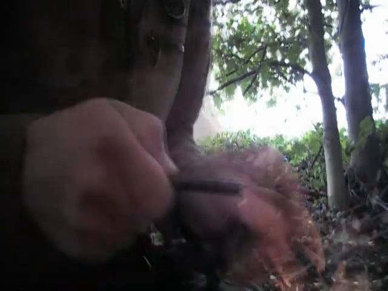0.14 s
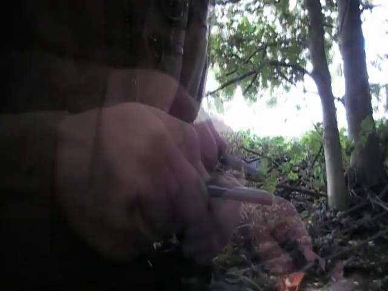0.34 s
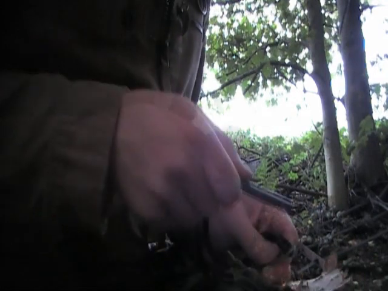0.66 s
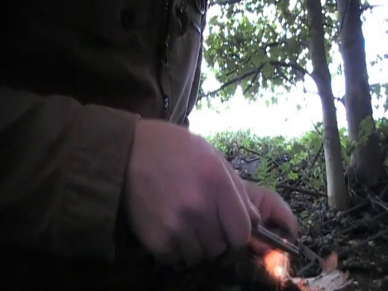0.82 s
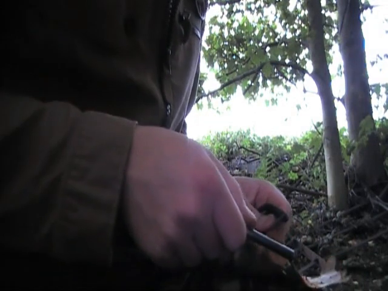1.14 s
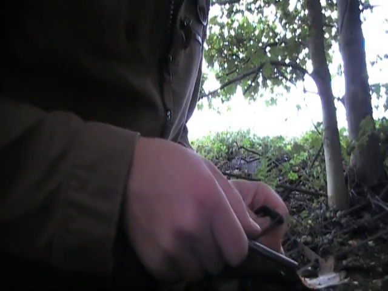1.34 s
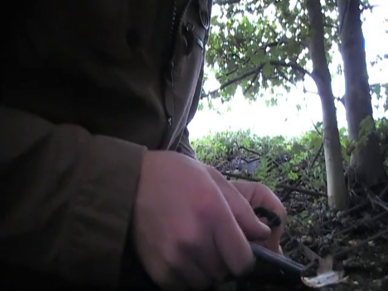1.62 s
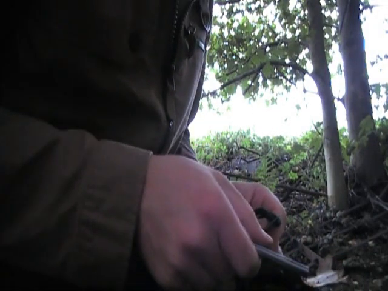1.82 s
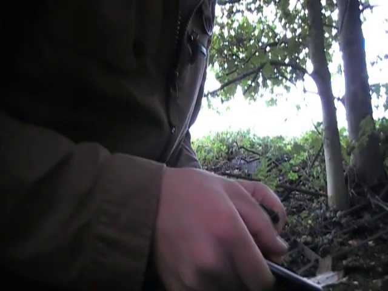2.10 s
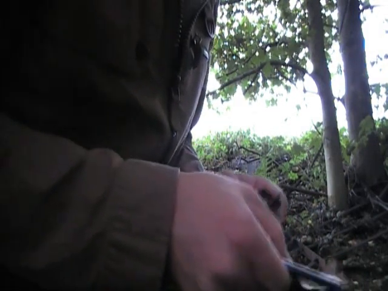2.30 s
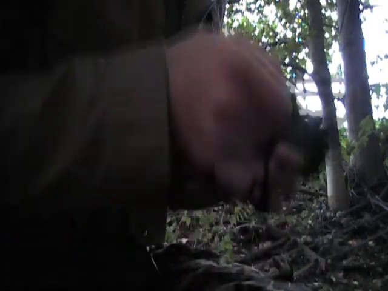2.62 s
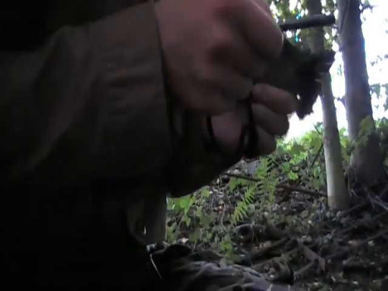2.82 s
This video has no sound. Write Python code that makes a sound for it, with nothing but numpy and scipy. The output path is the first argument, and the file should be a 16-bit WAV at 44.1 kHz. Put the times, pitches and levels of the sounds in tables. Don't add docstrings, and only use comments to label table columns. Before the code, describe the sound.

A fire steel is struck in one harsh, bright, gritty rasp from about 0.05 to 0.28 seconds, very close. Dry sputters and snaps follow with soft hand thuds, cracking sharply at 0.8 and loudest at 0.94. Sparse ticks continue to 1.5. A faint ring jingles at 2.03, handle rubs follow until 2.4, then small ticks near 2.8-2.9, over faint hiss and distant traffic hum in open woodland.

```python
import sys
import numpy as np
from scipy import signal
from scipy.fft import rfft, irfft, next_fast_len
from scipy.io import wavfile
from scipy.ndimage import uniform_filter1d

SR = 44100
rng = np.random.default_rng(int(sys.argv[2]) if len(sys.argv) > 2 else 0)


def boost(x):
    u = np.asarray(x, float) / 20
    return 10 ** u


def unload_wav(signal):
    wavfile.write(
        sys.argv[1],
        SR,
        np.round(np.clip(np.atleast_2d(signal).T, -1, 1) * 32767).astype(np.int16),
    )


N = 130095
T = np.arange(N) / SR


def unit(x):
    return x / np.sqrt(np.mean(x ** 2) + 1e-20)


def along(points, hz):
    f, v = np.transpose(points)
    return np.interp(np.log(hz + 1), np.log(f + 1), v)


def filtered(x, response):
    m = next_fast_len(N + SR // 2)
    return irfft(rfft(x, m) * response(np.fft.rfftfreq(m, 1 / SR)), m)[..., :N]


def resonate(x, peaks):
    def response(f):
        total = 0
        for k, (centre_hz, width_hz, level_db) in enumerate(peaks):
            mode = 1j * f * width_hz / (centre_hz ** 2 - f * f + 1j * f * width_hz)
            total = total + (-1) ** k * boost(level_db) * mode
        return total / np.sqrt(np.mean(abs(total) ** 2))
    return filtered(x, response)


def pair(x, alike):
    def mid_side(hz):
        turn = np.arccos(np.clip(along(alike, hz), -1, 1)) / 2
        return np.array([np.cos(turn), np.sin(turn)])
    mid, side = filtered(x, mid_side)
    return np.array([mid + side, mid - side])


def dying(start_s, life_s):
    return (T >= start_s) * np.exp(-np.clip(T - start_s, 0, 1) / life_s)


def burst(start_s, length_s, fade_s):
    rise_s = .0007
    rise = np.clip((T - start_s) / rise_s, 0, 1)
    return rise * np.exp(-np.clip(T - start_s - length_s, 0, 1) / fade_s)


# centre_hz [Hz], width_hz [Hz], level_db [dB]
BRIGHT_MODES = [(8390, 2800, 1), (10210, 1570, 6), (11050, 1120, 4), (14160, 3000, -1.5)]
EDGE_MODES = [(5030, 1800, -5), (6270, 1200, 9.5)]
BODY_MODES = [(2250, 670, -3), (3053, 400, 4), (3677, 466, 2.5)]
THUD_MODES = [(318, 180, -2), (550, 190, 4), (980, 700, 1.5), (1430, 170, -5)]
HANDLE_MODES = [(2510, 860, 2), (3600, 400, 10), (6300, 1600, -2.5)]
# frequency_hz [Hz], likeness [-1 to 1]
NEAR_LIKENESS = [(60, 0.91), (180, 0.9), (1650, 1), (5000, 0.87), (9000, .8), (13000, 0.23)]


def steel():
    grains = grit()
    rasp, body, thud = stroke(grains)
    sparks, spark_body = sputters(grains) + cracks(grains) + snap_tails()
    bright = rasp + sparks
    gains = [bright, bright * boost(edge_db(T)), body + spark_body, thud, rubs(grains)]
    pushes = [gain * np.sign(rng.standard_normal((2, N))) for gain in gains]
    for push, blow in zip(pushes, snap_blows()):
        push += blow
    modes = [BRIGHT_MODES, EDGE_MODES, BODY_MODES, THUD_MODES, HANDLE_MODES]
    rung = sum(resonate(push, peaks) for push, peaks in zip(pushes, modes))
    near = pair(rung, NEAR_LIKENESS) + knocks()
    return filtered(near, lambda hz: 1j * hz / (150 + 1j * hz))


def grit():
    slips_per_s, slip_s, spread_db, smooth_db = 1000, 0.0012, 4.5, 1
    sizes = boost(spread_db * np.minimum(rng.exponential(size=N), 1.5))
    slips = (rng.random(N) < slips_per_s / SR) * sizes
    rough = signal.lfilter([1], [1, -np.exp(-1 / (slip_s * SR))], slips)
    return unit(unit(rough) + boost(smooth_db))


# start_s [s], level_db [dB], body_over_db [dB over level], thud_over_db [dB over level]
STROKE_COURSE = [(0.0, -73, -3, -18), (.03, -45.5, -6, -32), (.06, -37.5, -11.5, -37),
                 (.075, -25, -13, -37), (0.1, -19.5, -22.5, -35), (0.117, -24.5, -10, -20),
                 (.138, -14, -8.5, -19), (0.155, -23.5, -8, -17.5), (.182, -25, -3.5, -14.5),
                 (0.255, -28.5, -5, -14), (.275, -43, -2, -14)]


def stroke(grains):
    start_s, level_db, body_db, thud_db = np.transpose(STROKE_COURSE)

    def curve(db):
        return boost(np.interp(T, start_s, db, right=-120))
    rasp = (grains + 1) / 2 * curve(level_db - 1)
    body = grains[::-1] * curve(level_db + body_db - 3)
    return rasp, body, grains * curve(level_db + thud_db)


# start_s [s], level_db [dB]
EDGE_COURSE = [(0, -8), (.07, -28), (.12, -10.5), (.2, -6), (.45, -8), (.8, -15.5), (1.0, -12.5), (2.4, -8),
               (2.8, -13)]


def edge_db(at_s):
    return np.interp(at_s, *np.transpose(EDGE_COURSE))


# start_s [s], length_s [s], level_db [dB], body_over_db [dB over level]
SPUTTER_EVENTS = [(0.275, 0.037, -40.5, -8), (0.321, 0.0075, -30, -2.5), (0.336, 0.0027, -33, -8),
                  (0.362, 0.0086, -39.5, -10), (0.411, 0.01, -26, -7), (0.43, 0.029, -50, -7),
                  (0.477, 0.0041, -40, -8.5), (0.5133, 0.019, -34.5, -7.5), (0.557, 0.019, -32, -5),
                  (.70, 0.039, -52.5, -6), (0.9327, 0.0071, -29, -8), (0.962, 0.022, -48.5, -2),
                  (0.995, 0.0097, -41.5, -11), (1.01, 0.023, -47, -9), (1.427, 0.0085, -29, -11),
                  (1.455, 0.0043, -41.5, -9), (1.491, 0.0027, -45, -5), (2.031, 0.029, -54, -10),
                  (2.678, .015, -53.5, 0), (2.708, 0.021, -55.5, -5), (2.75, 0.059, -55, -2),
                  (2.853, 0.039, -44.5, -8.5)]


def sputters(grains):
    total = np.zeros((2, N))
    for start_s, length_s, level_db, over_db in SPUTTER_EVENTS:
        gain = boost(level_db - 1) * grains * burst(start_s, length_s, .0015 + .25 * length_s)
        total += np.outer([1, boost(over_db)], gain)
    return total


# start_s [s], length_s [s], level_db [dB], body_over_db, sizzle_over_db [dB over level]
CRACK_EVENTS = [
    (0.7927, 0.0051, -30, -10, -8),
    (0.9443, 0.0015, -24, -4, 0.5),
]
SNAP_S = .0003


def cracks(grains):
    sizzle_s = .009
    total = np.zeros((2, N))
    for start_s, length_s, level_db, over_db, sizzle_db in CRACK_EVENTS:
        sizzle = boost(sizzle_db) * grains * dying(start_s, sizzle_s)
        gain = boost(level_db) * (burst(start_s, length_s, SNAP_S) + sizzle)
        total += np.outer([1, boost(over_db)], gain)
    return total


# start_s [s], peak_db [dB],
# body_over_db [dB over peak]
CATCH_EVENTS = [(0.0313, -19, -15), (0.0327, -36, -17), (0.0431, -31, -15), (0.0491, -41, -12),
                (0.0535, -34, -15), (0.058, -24, -10), (0.0601, -31, -8), (0.0905, -10.5, -28),
                (0.1084, -13.5, -2.5), (0.1198, -9, -21), (0.1322, -15, -15), (0.1337, -8, -18),
                (0.1445, -15, -2), (0.174, -18, -5), (0.1776, -10, -6), (0.1865, -9, -20),
                (0.2012, -17, -20), (0.2028, -20, -13.5), (0.2226, -16, 2), (0.2369, -23, -7),
                (0.2444, -17, -2), (0.2533, -14.5, -17), (0.2683, -28, -5), (0.2754, -33, 0),
                (0.2829, -23, -18), (0.2943, -23, -6), (0.3048, -24, -3), (0.3067, -21, -10),
                (0.3128, -36, -7)]
SPARK_SNAPS = [(0.3246, -24, -15), (0.3254, -17, 0), (0.3279, -10.5, -7.5), (0.3368, -26, -5),
               (0.3392, -37, -9), (0.3622, -30, -20), (0.3653, -39, -11), (0.3685, -27, -21),
               (0.37, -34, -7), (0.377, -29, -9), (0.4133, -29, -18), (0.4154, -23.5, 1),
               (0.4249, -10.5, -9.5), (0.429, -24, -11), (0.4343, -32, -6), (0.443, -30, -4),
               (0.4748, -29, -16), (0.479, -22, -13.5), (0.4805, -39, -3), (0.5112, -30, -11),
               (0.5174, -26, -16), (0.5195, -19.5, -10.5), (0.527, -18, -17), (0.5295, -17.5, -12),
               (0.5595, -36, -13), (0.5642, -17.5, -5), (0.5655, -17, -11), (0.5766, -21, -9),
               (0.6078, -31.5, -12), (0.6702, -33, -18), (0.6912, -41, -3), (0.708, -28.5, -19),
               (0.7814, -39, -12), (0.794, -17.5, -2), (0.7951, -8, -11), (0.7965, -16, -8),
               (0.7982, -15, -18), (0.8153, -44, 3), (0.8336, -28.5, -20), (0.8679, -25.5, -4.5),
               (0.871, -29, -4),
               (0.9275, -11, -10), (0.9356, -23, -20), (0.938, -23, -11), (0.944, -9.5, -2),
               (0.9448, -6.5, -15), (0.9447, -9, -9), (0.9454, -18.5, -6), (0.947, -20, 2.5),
               (0.949, -23, -14), (0.9536, -18, -6), (0.9585, -23, -10), (0.961, -29, 0),
               (0.9992, -31, -13), (1.001, -36, -17), (1.0116, -33, -3), (1.0904, -32, -16),
               (1.3385, -35.5, -7), (1.3721, -19.5, -13.5), (1.375, -34, -13), (1.3874, -39, -7),
               (1.4303, -22, -12), (1.4337, -21.5, -12), (1.4433, -31.5, -6), (1.4569, -39, -5),
               (1.4886, -39, -16), (1.4927, -39, -11), (2.0315, -40, -19), (2.1026, -47, 16.5),
               (2.1579, -35.5, -8), (2.2719, -43.5, 12), (2.412, -35, -3), (2.4193, -34, -1),
               (2.5544, -37, -12), (2.639, -38, -7), (2.7716, -45, 0), (2.8051, -23.5, -6), (2.808, -44, 3),
               (2.859, -25, -11), (2.86, -36.5, -10), (2.8657, -36, -13), (2.8717, -24, -25),
               (2.876, -37, -23), (2.8784, -45, -17), (2.8884, -36, -8), (2.897, -37, -2),
               (2.9333, -34, -13)]
ALL_SNAPS = CATCH_EVENTS + SPARK_SNAPS


def snap_blows():
    blow_db, edge_over_db, side_share = 9.5, 5, 0.74
    blows = np.zeros((3, 2, N))
    for start_s, peak_db, over_db in ALL_SNAPS:
        sign, side = rng.standard_normal(2)
        mode_db = np.array([0, edge_db(start_s) + edge_over_db, over_db])
        sizes = boost(peak_db + blow_db + mode_db)
        blows[..., round(start_s * SR)] = np.sign(sign) * np.outer(sizes, [1, side_share * side])
    return blows


def snap_tails():
    spit_db, tail_s, tail_db = -12, .003, -22
    total = np.zeros((2, N))
    for start_s, peak_db, over_db in ALL_SNAPS:
        fall = dying(start_s, SNAP_S) + boost(tail_db) * dying(start_s, tail_s)
        total += np.outer([1, boost(over_db)], boost(peak_db + spit_db) * fall)
    return total


# start_s [s], length_s [s], level_db [dB]
RUB_EVENTS = [
    (2.099, 0.024, -53.5),
    (2.192, 0.036, -51),
    (2.242, 0.034, -48.5),
    (2.396, 0.035, -55),
    (2.679, 0.016, -59),
    (2.77, 0.015, -58.5),
]


def rubs(grains):
    fade_s = .0015
    return grains * sum(boost(db) * burst(start_s, length_s, fade_s) for start_s, length_s, db in RUB_EVENTS)


# start_s [s], level_db [dB]
KNOCK_EVENTS = [
    (0.134, -27),
    (.187, -20),
    (0.323, -31),
    (.42, -28),
    (0.565, -28),
    (0.796, -26.5),
    (0.944, -12),
]
# centre_hz [Hz], width_hz [Hz], level_db [dB]
PALM_MODES = [(323, 195, -2.5), (720, 135, 1), (1000, 126, 2.5), (1460, 190, -1.5)]


def knocks():
    knock_s = .0003
    return resonate(sum(boost(db - 9.0) * dying(start_s, knock_s) for start_s, db in KNOCK_EVENTS), PALM_MODES)


# start_s [s], level_db [dB]
JINGLE_EVENTS = [
    (2.030, -39.5),
    (2.047, -38.5),
]
# pitch_hz [Hz], level_db [dB], t60_s [s]
RING_MODES = [(7110, -14, .08), (8870, -7, .07), (10340, -12, .3), (11680, -2, .25), (11790, -5, .2),
              (11980, -10, .12), (12340, -8, .07)]


def jingle():
    total = np.zeros(N)
    for start_s, touch_db in JINGLE_EVENTS:
        for pitch_hz, mode_db, t60_s in RING_MODES:
            level = boost(touch_db + mode_db - 3.5 + rng.normal(0, 2.6))
            waver = 1 + 0.58 * unit(uniform_filter1d(rng.standard_normal(N), size=120))
            tone = np.sin(2 * np.pi * pitch_hz * (T - start_s))
            total += level * waver * dying(start_s, t60_s / np.log(1000)) * tone
    return total


# frequency_hz [Hz], likeness [-1 to 1]
FAR_LIKENESS = [(60, 0.56), (150, 0.51), (380, 0.96), (950, 0.93), (2380, 0.85), (5980, 0.62),
                (15000, -0.19)]


def air(spectrum, level):
    patchy_db, over_db = 0.5, 1
    z = signal.stft(rng.standard_normal((2, N)), nperseg=512)[2]
    field = uniform_filter1d(rng.standard_normal(z.shape[1:]), size=6, axis=0)
    field = uniform_filter1d(field, size=10, axis=1)
    noise = signal.istft(z * boost(patchy_db * unit(field)), nperseg=512)[1][:, :N]
    coloured = filtered(noise, lambda hz: boost(along(spectrum, hz)))
    swell = boost(over_db + np.interp(T, *np.transpose(level)))
    return unit(pair(coloured, FAR_LIKENESS)) * swell


# frequency_hz [Hz], density_db [dB per Hz]
HISS_SPECTRUM = [(500, 2), (2500, -0.5), (5000, -2), (9000, -1.5), (12000, -5.5), (14000, -2)]
# start_s [s], level_db [dB]
HISS_COURSE = [(0, -46), (.25, -46.5), (.4, -50), (.73, -52), (1.15, -54.5), (1.5, -57), (2.06, -57),
               (2.28, -54), (2.33, -53.5), (2.65, -55), (2.95, -52.5)]


def hiss():
    return air(HISS_SPECTRUM, HISS_COURSE)


# frequency_hz [Hz], density_db [dB per Hz]
HUM_SPECTRUM = [(20, -24), (60, -20), (300, -11), (650, -7), (950, -2.5), (1600, -13), (3200, -21),
                (8000, -36.5)]
# start_s [s], level_db [dB]
HUM_COURSE = [(0.6, -53), (1.25, -52), (1.73, -49), (2.37, -51), (2.95, -49.5)]


def traffic():
    return air(HUM_SPECTRUM, HUM_COURSE)


def scene():
    return steel() + jingle() + hiss() + traffic()


def trim(x):
    quiet_hz, hz_per_db, band_hz, first_hz = 12750, 42, 690, 100
    sudden_db, sudden_hz = 9, 15900
    hz, _, z = signal.stft(x, SR, nperseg=512)
    treble = z[:, (hz > 9000) & (hz < 12500)]
    power = (abs(treble) ** 2).sum(axis=(0, 1))
    treble_db = 10 * np.log10(uniform_filter1d(power, size=2) + 1e-14)
    top_hz = quiet_hz + hz_per_db * (treble_db - np.quantile(treble_db, .1))
    top_hz = np.where(np.gradient(treble_db) > sudden_db / 2, sudden_hz, top_hz)
    top_hz = first_hz + band_hz * np.round((top_hz - first_hz) / band_hz)
    return signal.istft(z * (hz[:, None] < top_hz), SR, nperseg=512)[1][:, :N]


def top_cut(x):
    return signal.sosfilt(signal.butter(12, 15600, fs=SR, output="sos"), x)


# frequency_hz [Hz], level_db [dB]
MICROPHONE_LEAN = [(60, -2.5), (200, -5.5), (700, -4.5), (2400, -3), (8000, -2.5), (11000, -1.5),
                   (14000, -16.5)]
# frequency_hz [Hz], lead [radians]
MICROPHONE_LEAD = [(3500, 0.01), (5000, -.15), (8500, -.3), (10500, -1.1), (13000, -.5)]


def record(dry):
    low_cut_hz, top_hz, top_db_per_khz = 50, 12200, -11

    def microphones(hz):
        half = boost(along(MICROPHONE_LEAN, hz) / 2) * np.exp(.5j * along(MICROPHONE_LEAD, hz))
        top = boost(top_db_per_khz * np.clip(hz - top_hz, 0, None) / 1000)
        low = (hz / np.hypot(hz, low_cut_hz)) ** 2
        return top * low * np.array([half, 1 / half])
    mix = trim(filtered(dry, microphones))
    return top_cut(mix)


dry = scene()
out = record(dry)
unload_wav(out)
```